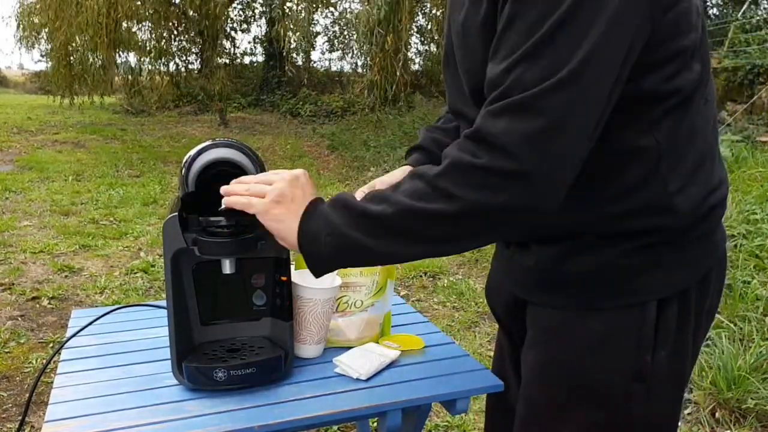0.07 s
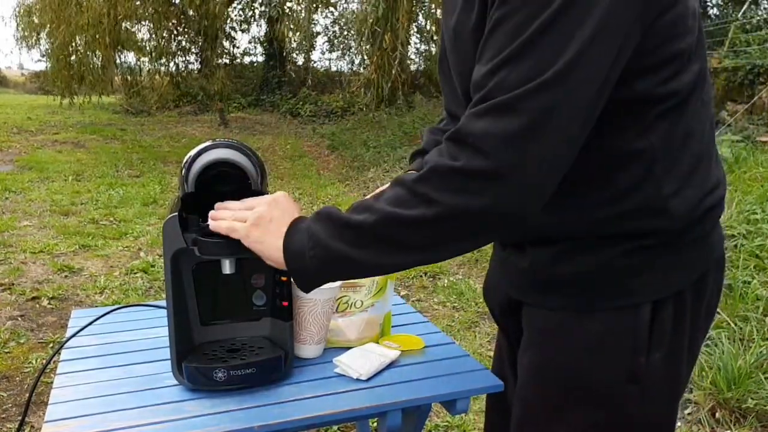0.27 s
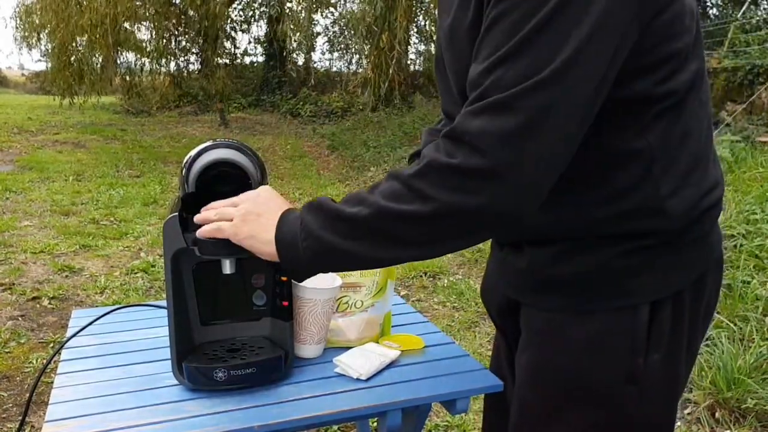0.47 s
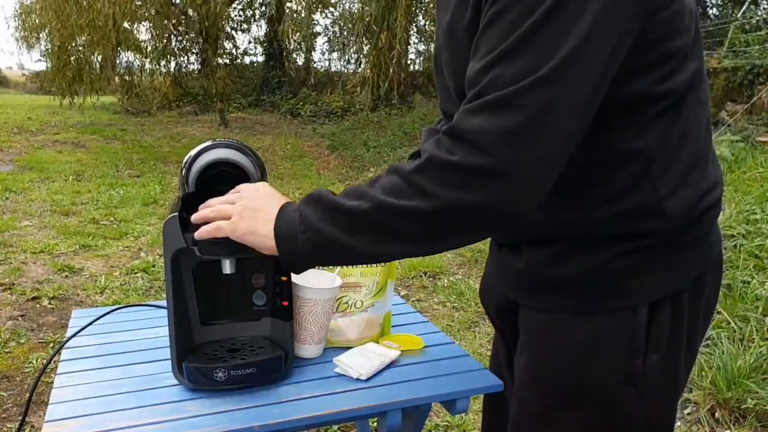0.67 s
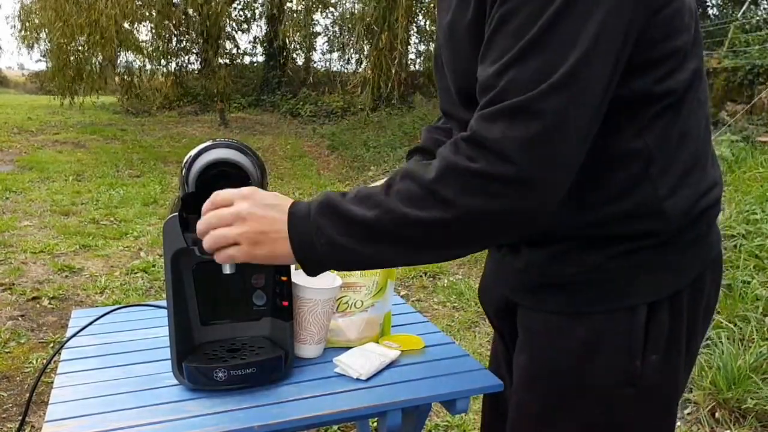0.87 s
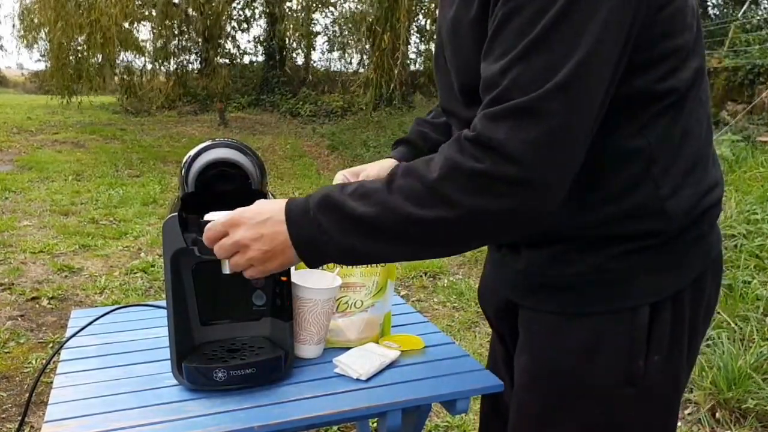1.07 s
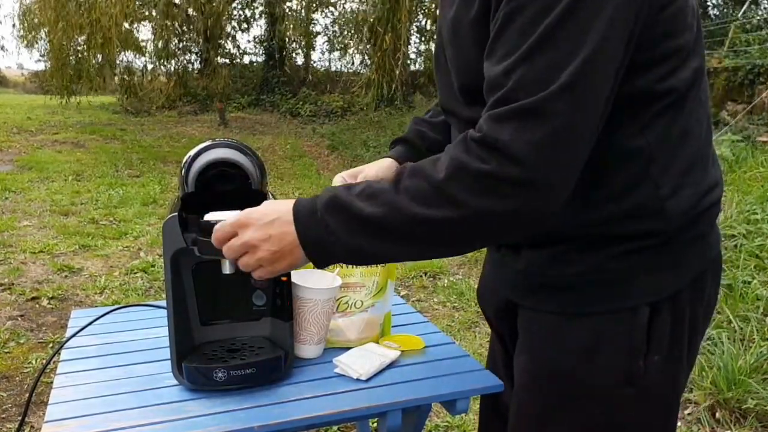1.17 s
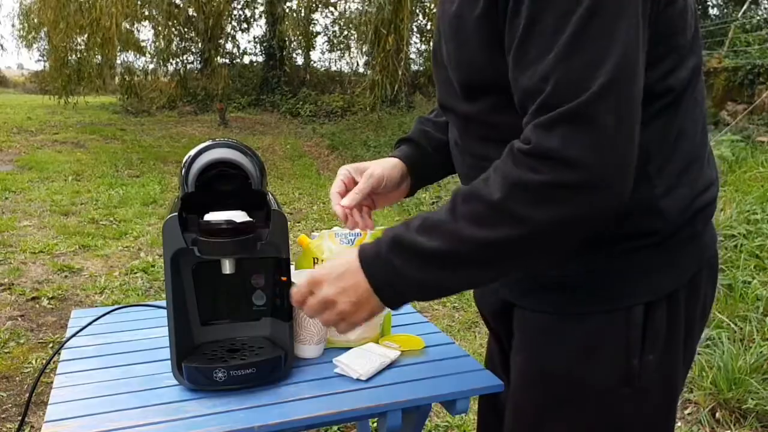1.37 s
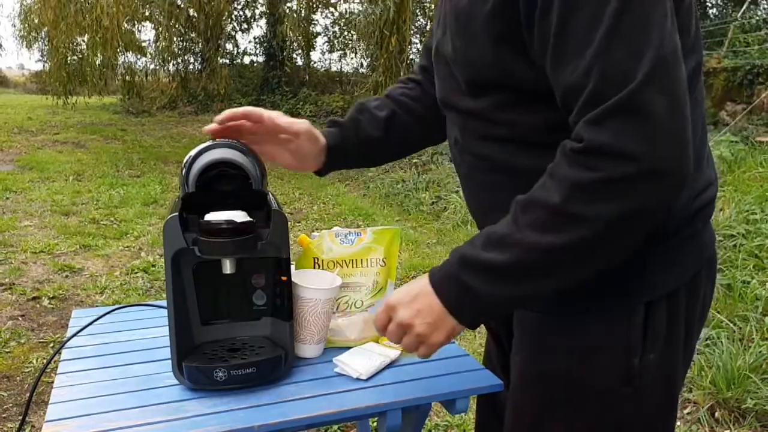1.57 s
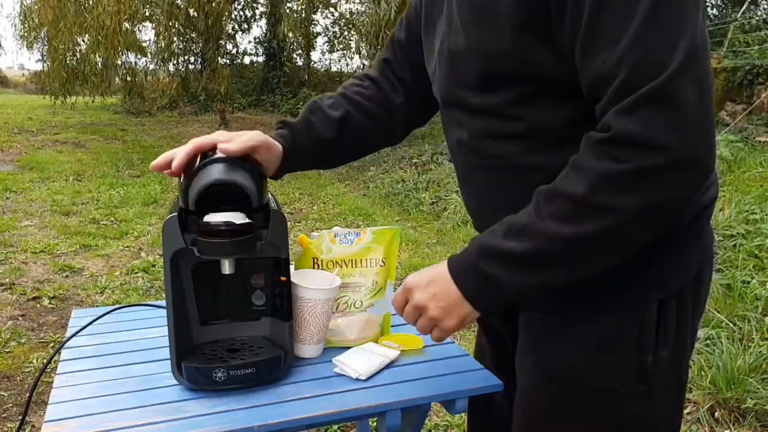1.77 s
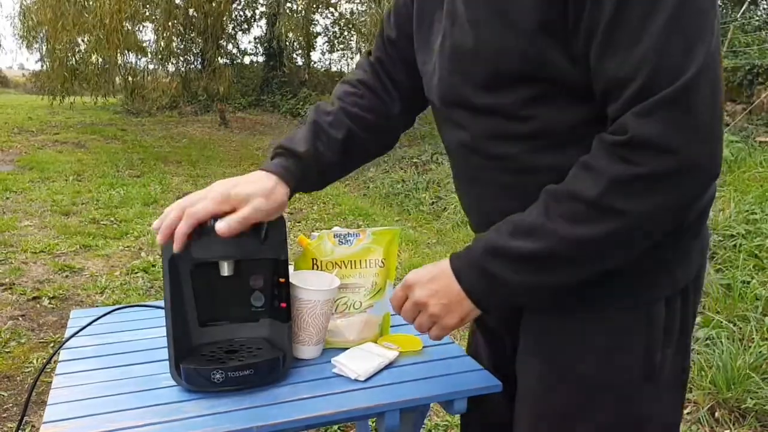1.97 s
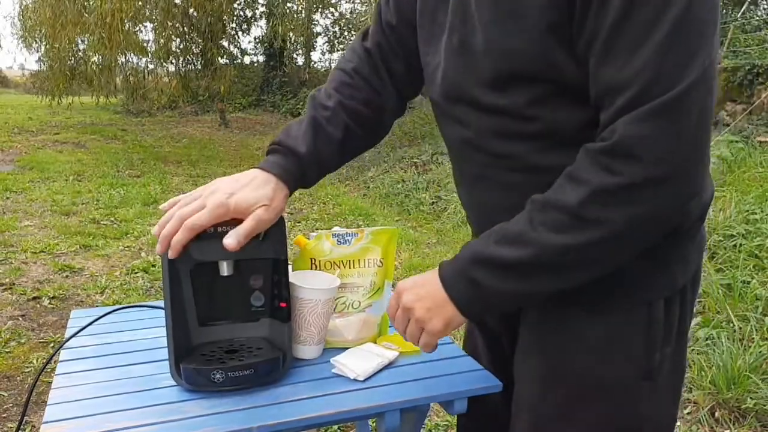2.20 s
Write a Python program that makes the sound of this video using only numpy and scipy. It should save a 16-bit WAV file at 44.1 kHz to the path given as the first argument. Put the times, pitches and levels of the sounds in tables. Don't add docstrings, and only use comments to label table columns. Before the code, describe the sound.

Plastic coffee machine lid pressed shut with a sharp latch snap, after soft pod taps, windy outdoors

```python
import sys
import numpy as np
from scipy import signal
from scipy.fft import rfft, irfft
from scipy.io import wavfile
from scipy.ndimage import uniform_filter1d

SR = 44100
rng = np.random.default_rng(int(sys.argv[2]) if len(sys.argv) > 2 else 0)


def dump(signal):
    limited = np.clip(np.atleast_2d(signal).T, -1, 1)
    pcm = np.round(limited * 32767).astype(np.int16)
    wavfile.write(sys.argv[1], SR, pcm)


def voltage_ratio(decibels):
    exponent = np.asarray(decibels, float) / 20
    return 10 ** exponent


N = 98607

# (f/Hz, level/dB, time to fall 60 dB/s)
LID_MODES = [(301, -16, 0.098), (345, -3, 0.049), (420, -7, 0.047), (570, -9.5, 0.061), (700, -8.5, 0.021),
             (1060, -14.5, 0.021), (1290, -4, 0.032), (1520, -3, 0.032), (1770, -8.5, 0.015),
             (2214, -9, .02), (2526, -2.5, 0.012), (3600, -7.5, .01), (4750, -19, .008),
             (5400, -10.5, 0.0064)]
CONTACT_SPOTS = [.8, 1.22, 1]
LID_SHELL_DB = -0.5


def evened(x):
    return x / np.sqrt(np.mean(x ** 2) + 1e-20)


def read(points, hz):
    f, value = np.transpose(points)
    return np.interp(np.log(hz + 1), np.log(f + 1), value)


def leaves():
    # (f/Hz, level/dB)
    leaf_colour = [(290, -27), (500, -7.5), (730, -15.5), (1100, -18.5), (1200, -19.5), (6410, -9),
                   (8840, -18), (14100, -18), (16300, -34.5)]
    # (f/Hz, likeness 0 to 1)
    leaf_likeness = [(500, 0.21), (6000, 0), (10000, 0.25), (16000, 0.69)]
    level_db, patch_db = -62.5, 1.2
    frames, hz = N // 256 + 5, np.fft.rfftfreq(1024, 1 / SR)
    a, b, c, d, patches = rng.standard_normal((frames, 513, 5)).T
    patches = uniform_filter1d(patches, size=14, axis=0)
    patches = evened(uniform_filter1d(patches, size=16, axis=1))
    same = np.clip(read(leaf_likeness, hz), -1, 1)[:, None]
    left = a + 1j * b
    right = same * left + np.sqrt(1 - same ** 2) * (c + 1j * d)
    colour = read([(150, -82)] + leaf_colour, hz)[:, None]
    spectrum = np.array([left, right]) * voltage_ratio(colour + patch_db * patches)
    hiss = signal.istft(spectrum, nperseg=1024, noverlap=768)[1][:, :N]
    return voltage_ratio(level_db) * evened(hiss)


def wind():
    # (t/s, level/dB)
    gust_strength = [(0, -47), (.16, -53), (.27, -44), (.43, -56), (.55, -41), (.64, -49.5), (.76, -48),
                     (.88, -46.5), (.96, -40), (1.1, -47), (1.2, -39.5), (1.33, -47.5), (1.45, -52),
                     (1.6, -43.5), (1.72, -38), (1.87, -40), (2.0, -48.5), (2.236, -49)]
    # (f/Hz, level/dB)
    wind_colour = [(8.8, -66), (15, -21), (48, -3), (75, 0), (126, -6), (253, -20), (333, -27), (494, -36),
                   (900, -63.5), (1170, -52), (1980, -120)]
    lump_db, lump_s, gust_brightness = 2.5, .018, .25
    frames, hz = N // 256 + 13, np.fft.rfftfreq(2048, 1 / SR)
    s, db = np.transpose(gust_strength)
    t = (np.arange(frames) - 8) * 256 / SR
    level = np.interp(t, s, db)
    noise = rng.standard_normal((2, frames, 1025)) + 1j * rng.standard_normal((2, frames, 1025))
    colour = read(wind_colour + [(2000, -70)], hz)
    reach = 1 + gust_brightness * np.log2(np.clip(hz, 50, 800) / 100)
    spectrum = noise * voltage_ratio(colour + (level[:, None] - db.mean()) * reach)
    rumble = signal.istft(spectrum.transpose(0, 2, 1), nperseg=2048, noverlap=1792)[1][:, 2048:2048 + N]
    size = round(lump_s * SR)
    lumps = uniform_filter1d(rng.standard_normal((2, N)), size=size)
    lumps = evened(uniform_filter1d(lumps, size=size))
    mean_db = 10 * np.log10(np.mean(voltage_ratio(level) ** 2))
    return evened(rumble * voltage_ratio(lump_db * lumps)) * voltage_ratio(mean_db + 1.5)


def puffs():
    # (t/s, level/dB, left share [ratio], right share [ratio])
    buffets = [(0.198, -36.5, 1, -0.86), (0.275, -35, -1.1, -0.79), (0.538, -34, -0.16, -1.2),
               (0.568, -36, 1, -1), (0.584, -38, -0.91, 0.87), (0.695, -30.5, -.8, -0.61),
               (0.77, -21, -0.56, -0.3), (0.944, -24.5, -0.82, -1.1), (0.961, -23.5, -1.1, 0.76),
               (1.03, -25, -0.55, -0.58), (1.15, -20, 0.35, -0.47), (1.205, -22, 0.74, -0.079),
               (1.23, -35.5, 0.73, -1.3), (1.276, -20.5, -0.54, 0.11), (1.319, -29, -0.55, -0.81),
               (1.581, -29.5, 0.97, -1.3), (1.657, -24.5, -0.93, -0.21), (1.686, -15, 0.72, -0.82),
               (1.822, -28.5, -.5, -0.8), (1.858, -27.5, -0.86, -0.31), (2.099, -27, 0.95, 0.41)]
    swing_hz, length_s, right_delay_s = 95, .0062, .0015
    out = np.zeros((2, N))
    t = np.arange(-2000, 2000) / SR - np.array([[0], [right_delay_s]])
    bump = np.cos(2 * np.pi * swing_hz * t) * np.exp(-abs(t / length_s) ** 1.34)
    for s, db, left, right in buffets:
        start = round(s * SR) - 2000
        out[:, start:start + 4000] += voltage_ratio(db) * np.array([[left], [right]]) * bump
    return out


def ring(drive, modes, tilt_db, shell_db, favoured_hz):
    # (f/Hz, level/dB)
    shell_colour = [(200, -50), (600, -11.5), (1600, -17.5), (3700, -16), (6500, -23), (9500, -31.5),
                    (12000, -23.5), (16000, -35)]
    shell_t60_s, shell_damping = .032, .6
    favour_db, favour_octaves = 11, .28
    t = np.arange(2600) / SR
    shell_hz = np.geomspace(300, 16000, 90) * rng.uniform(1.0, 1.02, 90)
    shell_level = read(shell_colour, shell_hz) + shell_db + 1.76 * rng.standard_normal(90)
    shell_t60 = shell_t60_s * (1000 / shell_hz) ** shell_damping
    main_hz, main_db, main_t60 = np.transpose(modes)
    main_hz = main_hz * (1 + .006 * rng.standard_normal(len(modes)))
    main_db = main_db + 2 * rng.standard_normal(len(modes))
    hz = np.concatenate([main_hz, shell_hz])[:, None]
    db = np.concatenate([main_db, shell_level])[:, None]
    t60 = np.concatenate([main_t60, shell_t60])[:, None]
    db = db + tilt_db * np.log2(np.minimum(hz, 7000) / 1000)
    db = db + favour_db * np.exp(-(np.log2(hz / favoured_hz) / favour_octaves) ** 2)
    fading = voltage_ratio(db - 60 * t / np.maximum(t60, .002))
    body = rng.choice([-1, 1], hz.shape) * fading * np.sin(2 * np.pi * hz * t)
    return signal.fftconvolve(drive, body.sum(0))


def hits(contacts, modes, shell_db):
    chatter_per_s = 4000
    sharp_s = .004
    out, t = np.zeros((len(CONTACT_SPOTS), N + 9000)), np.arange(2000) / SR
    for k, (s, db, tilt_db, chatter_s, favoured_hz) in enumerate(contacts):
        drive = rng.standard_normal(2000) * (rng.random(2000) < chatter_per_s / SR)
        drive *= np.exp(-t / chatter_s)
        drive *= np.minimum(t / max(chatter_s - sharp_s, 1e-5), 1)
        drive[0] = 2.13 * min(sharp_s / chatter_s, 1) ** 2
        sound = ring(drive / np.linalg.norm(drive), modes, tilt_db, shell_db, favoured_hz)
        start = round(s * SR)
        out[k % len(CONTACT_SPOTS), start:start + len(sound)] += voltage_ratio(db) * 0.46 * sound
    return out[:, :N]


def pod_taps():
    # (t/s, strength level/dB, hardness tilt/dB per octave, chatter/s, favoured f/Hz)
    tap_table = [(.153, -55, 8, 0.013, 1000), (.160, -52, -3, 0.0042, 1250), (.166, -48, 0, 0.011, 1250),
                 (.1802, -46, 6.5, .002, 1250), (.1845, -38, 0, 0.0039, 790),
                 (.189, -43.5, 3.5, 0.0041, 2000), (.193, -43.5, 2, 0.0033, 770), (.232, -49, 5, .012, 595),
                 (.255, -46, -0.5, 0.0095, 1000), (.2902, -36.5, 5.5, 0.0017, 532),
                 (.2942, -39.5, 8, 0.0012, 1440), (.298, -36.5, 3, 0.003, 980),
                 (.302, -47, 2, 0.0038, 1530), (.31, -55.5, 2.5, 0.038, 382),
                 (.358, -54.5, -7.5, 0.015, 1330), (.421, -56, -4.5, 0.0041, 580),
                 (.427, -53, 4, 0.0057, 610), (.4365, -59.5, 11.5, .001, 2400),
                 (.4372, -44.5, 3.5, 0.0018, 1250), (.443, -52.5, 5.5, 0.0021, 900),
                 (.448, -52, -4, 0.01, 1250)]
    # (f/Hz, level/dB, time to fall 60 dB/s)
    pod_modes = [(330, 0.5, .1), (411, 2.5, 0.066), (567, 2, 0.033), (768, 2.5, 0.073), (1036, -2, 0.046),
                 (1250, 1.5, 0.019), (1530, -5, 0.02), (1800, -10.5, 0.065), (2400, -9, 0.03),
                 (2600, -12, 0.017)]
    return hits(tap_table, pod_modes, 1)


def grind():
    # (t/s, pressure level/dB)
    palm_push = [
        (1.931, -48.5),
        (1.953, -59),
        (1.961, -43.5),
        (1.99, -43),
        (2.007, -48.5),
        (2.013, -43),
        (2.036, -50),
        (2.05, -65),
        (2.083, -62),
    ]
    rub_points = [520, 800, 1900, 3000, 4200]
    slips_per_s, spread_db, tilt_db = 3500, 3, 2.5
    s, db = np.transpose(palm_push)
    slips = voltage_ratio(spread_db * np.minimum(rng.exponential(1, N), 4))
    slips = slips * (rng.random(N) < slips_per_s / SR)
    pressure = voltage_ratio(np.interp(np.arange(N) / SR, s, db, left=-200, right=-200))
    drive = evened(slips) * pressure
    point = rng.integers(0, 5, N)
    out = np.zeros((len(CONTACT_SPOTS), N))
    for k, hz in enumerate(rub_points):
        rub = ring(drive * (point == k), LID_MODES, tilt_db, LID_SHELL_DB, hz)
        out[k % len(CONTACT_SPOTS)] += rub[:N]
    return 0.18 * out


def lid_knocks():
    # (t/s, strength level/dB, hardness tilt/dB per octave, chatter/s, favoured f/Hz)
    knock_table = [(1.716, -46.5, -1.5, 0.009, 1610), (1.728, -45.5, -1.5, 0.0072, 353),
                   (1.774, -51, 0.5, 0.0084, 794), (1.891, -45, 7, 0.0073, 1270),
                   (1.9035, -30.5, -0.5, 0.0011, 2500), (1.9075, -25.5, 3.5, 0.0012, 1520),
                   (1.912, -38, 3, 0.0027, 1290), (1.9202, -21.5, 7, 0.00029, 2560),
                   (1.921, -22, 5, 0.00091, 6320), (1.9219, -24.5, 6.5, 0.0013, 1520),
                   (1.9232, -22, 0, 0.00022, 343), (1.9255, -33, 8.5, 0.0012, 2560),
                   (1.928, -28, 2, .003, 1290), (1.958, -22, 0.5, 0.0024, 700),
                   (1.964, -35, 5.5, 0.0027, 1520), (1.9765, -31.5, 2, 0.0022, 420),
                   (1.981, -27.5, 3, 0.0026, 345), (1.987, -35, 0.5, 0.0051, 1510),
                   (1.997, -37.5, -6.5, 0.0092, 577), (2.0118, -26.5, -1, 0.0016, 1030),
                   (2.0122, -35, 5, 0.0017, 5400), (2.014, -26, 1.5, 0.0013, 390),
                   (2.022, -26, -2, 0.0047, 570), (2.031, -45, 7, 0.0073, 314),
                   (2.047, -44.5, -7.5, 0.0084, 565), (2.075, -43, -5.5, 0.0066, 1800),
                   (2.09, -46.5, -3, 0.027, 510)]
    return hits(knock_table, LID_MODES, LID_SHELL_DB)


def placed(x, echo_db):
    # (f/Hz, phase/radians)
    left_lead = [(100, 0), (1000, .6), (2000, 1.3), (3600, 2.8), (4900, 3.5), (5900, 4.9), (6600, 6.2),
                 (16000, 6.3)]
    echo_t60_s, echo_top_hz = 0.14, 3230
    scatter_db, scatter_t60_s = -6, .004
    left_db = 2.5
    t, hz = np.arange(8000) / SR, np.fft.rfftfreq(N, 1 / SR)
    far = rng.standard_normal((2, 8000)) * voltage_ratio(-60 * t / echo_t60_s) * (t > .0015)
    far = signal.lfilter(*signal.butter(2, echo_top_hz, fs=SR), far)
    far = voltage_ratio(echo_db) * far / np.linalg.norm(far[0])
    near = rng.standard_normal((2, 8000)) * voltage_ratio(-60 * t / scatter_t60_s)
    near = near / np.linalg.norm(near[0])
    near = signal.lfilter(*signal.butter(2, [2500, 14000], "band", fs=SR), near)
    echo = signal.fftconvolve(x.sum(0)[None], far + voltage_ratio(scatter_db) * near, axes=1)[:, :N]
    side = np.array([[.5], [-.5]])
    direct = 0
    for sound, stretch in zip(x, CONTACT_SPOTS):
        direct = direct + rfft(sound) * np.exp(1j * read(left_lead, hz * stretch) * side)
    return irfft(voltage_ratio(left_db * side) * direct, N) + echo


def scene():
    background = leaves() + wind() + puffs()
    contacts = placed(pod_taps() + lid_knocks(), -20.5)
    return background + contacts + placed(grind(), -17)


def top_cut(x):
    return signal.sosfilt(signal.butter(12, 16450, fs=SR, output="sos"), x)


def record(dry):
    edge = signal.firwin(255, 16100, window=("kaiser", 9), fs=SR)
    mix = signal.oaconvolve(dry, edge[None], "same")
    return top_cut(mix)


dry = scene()
out = record(dry)
dump(out)
```